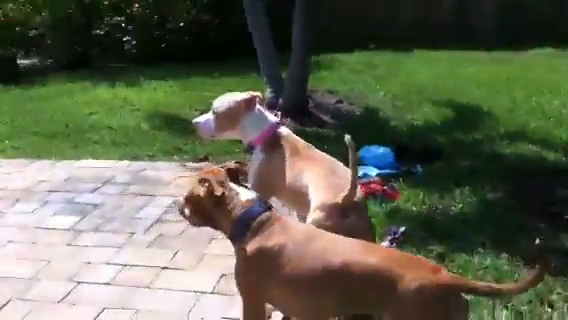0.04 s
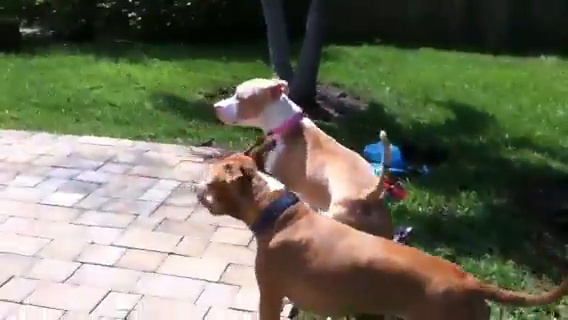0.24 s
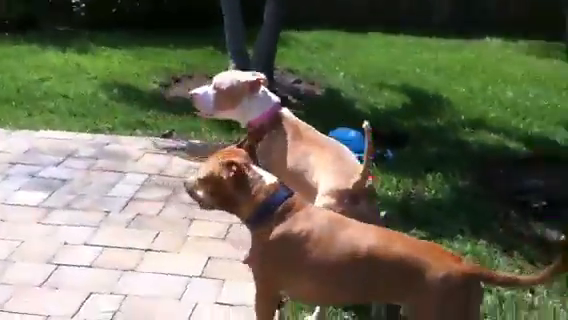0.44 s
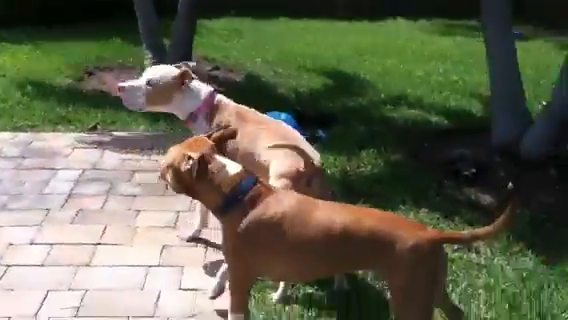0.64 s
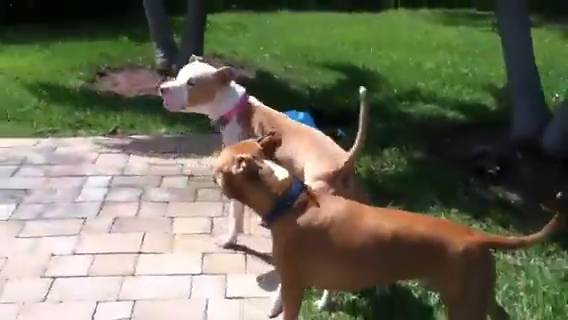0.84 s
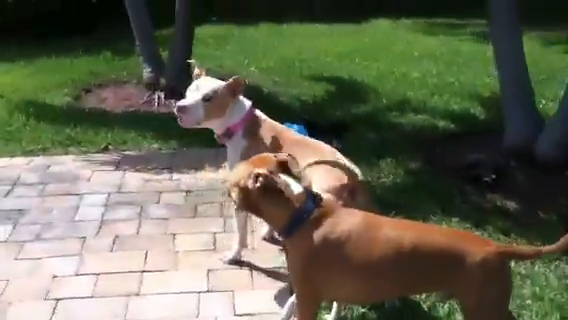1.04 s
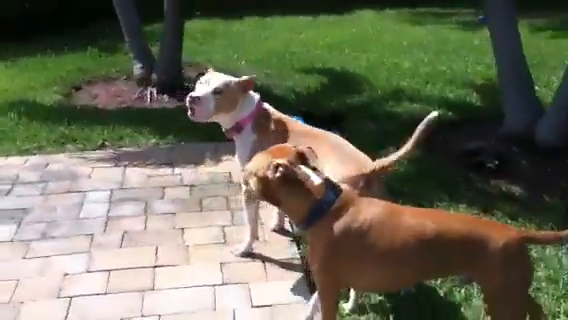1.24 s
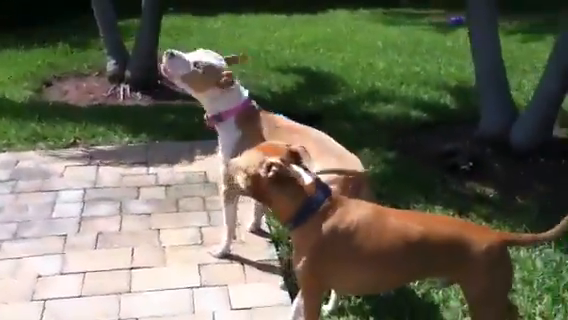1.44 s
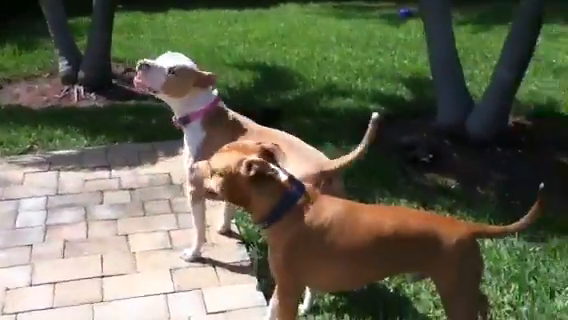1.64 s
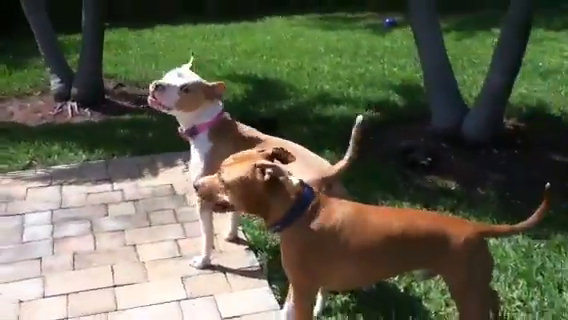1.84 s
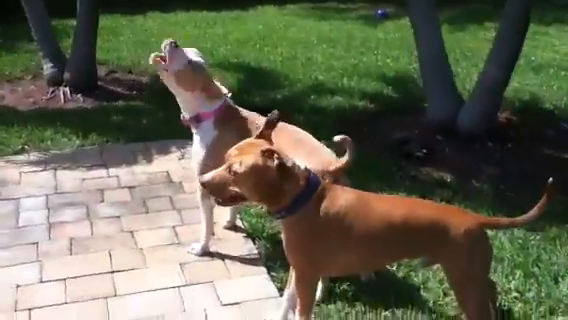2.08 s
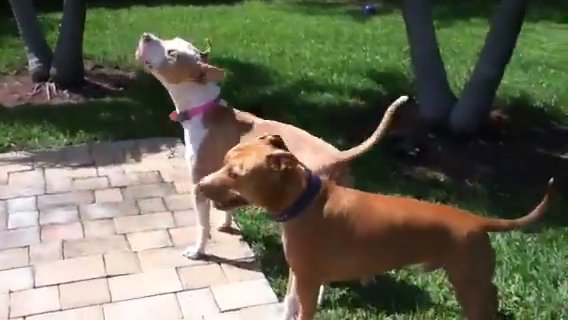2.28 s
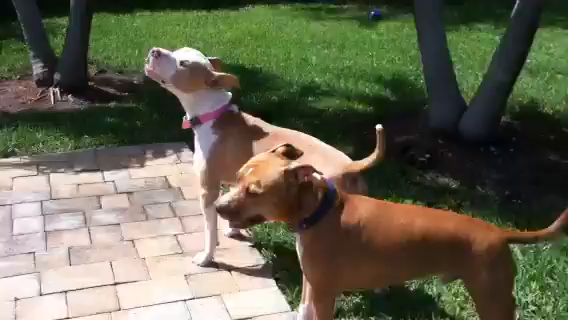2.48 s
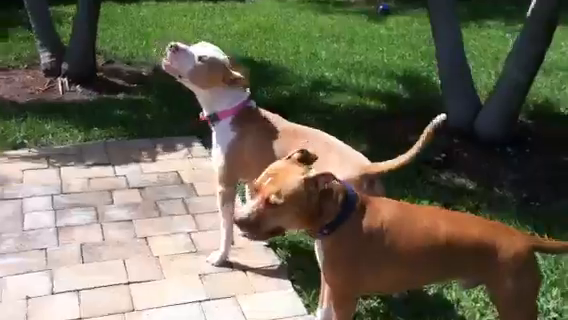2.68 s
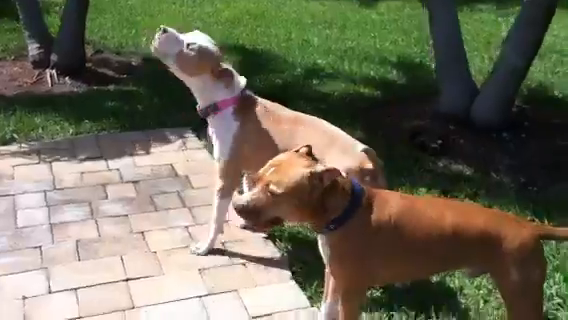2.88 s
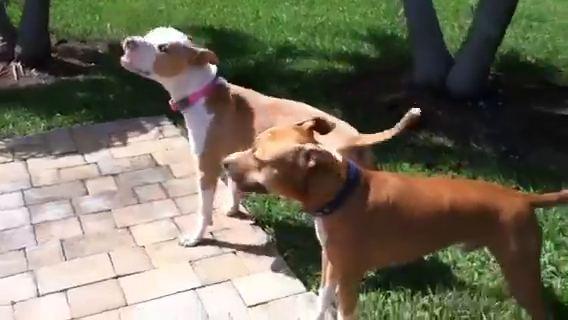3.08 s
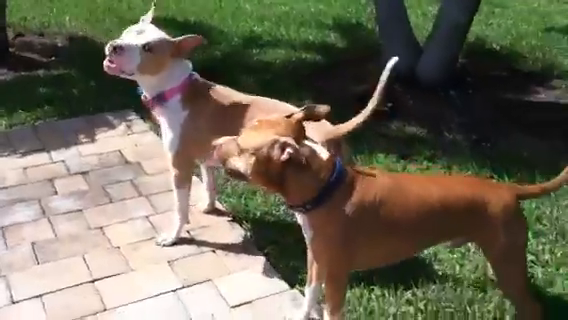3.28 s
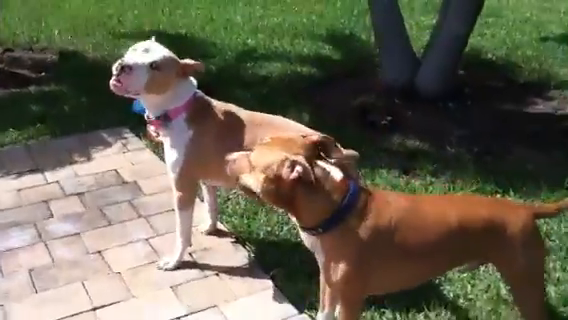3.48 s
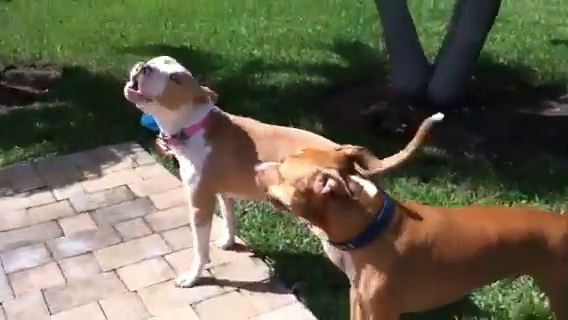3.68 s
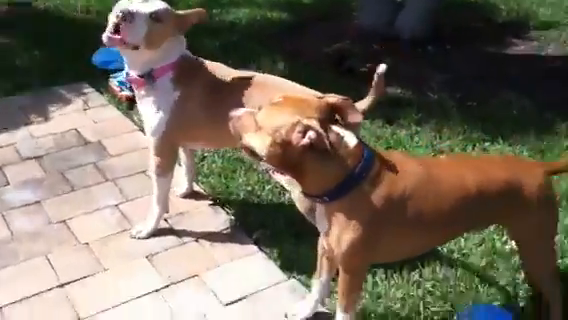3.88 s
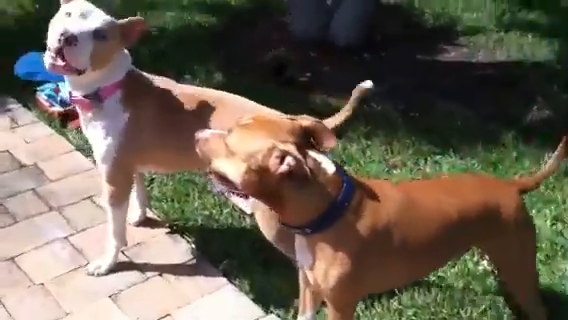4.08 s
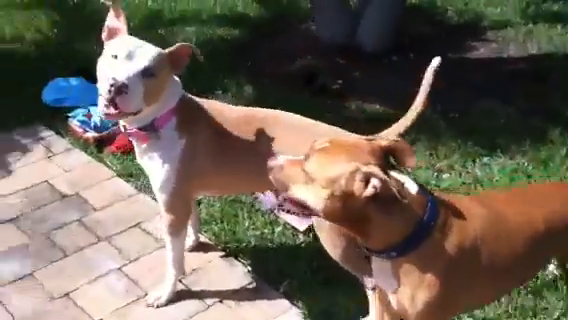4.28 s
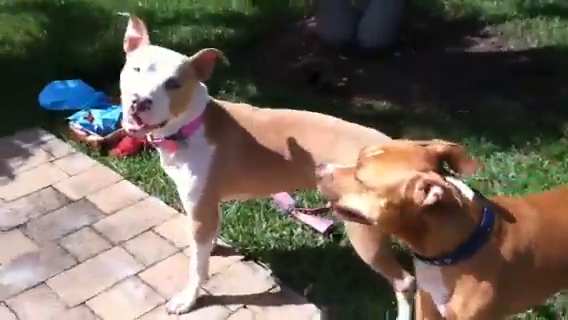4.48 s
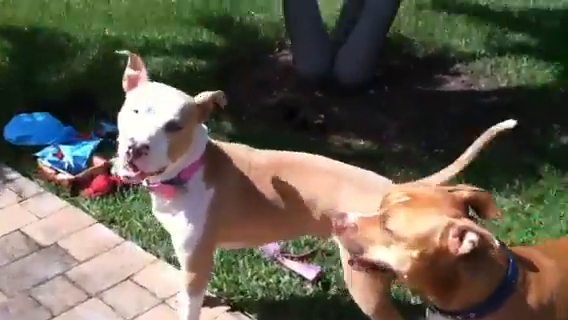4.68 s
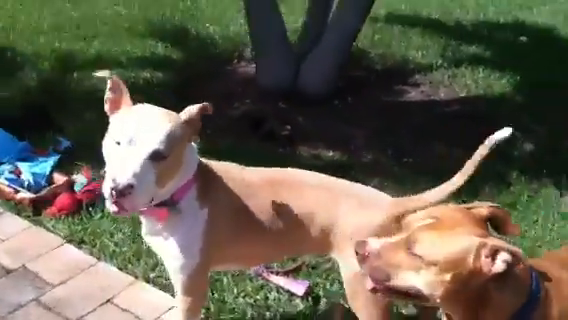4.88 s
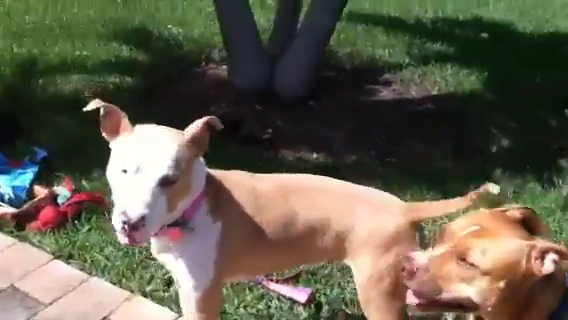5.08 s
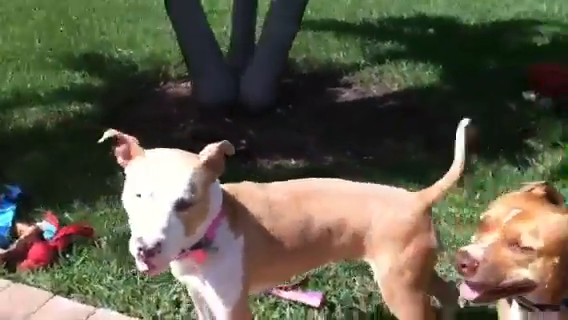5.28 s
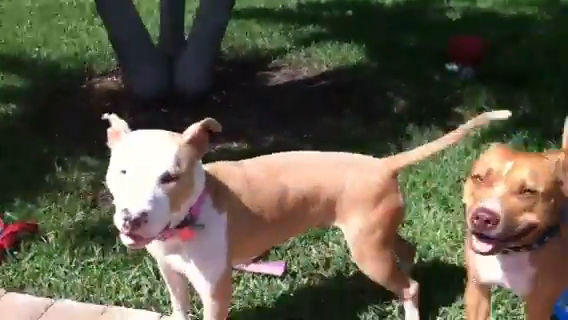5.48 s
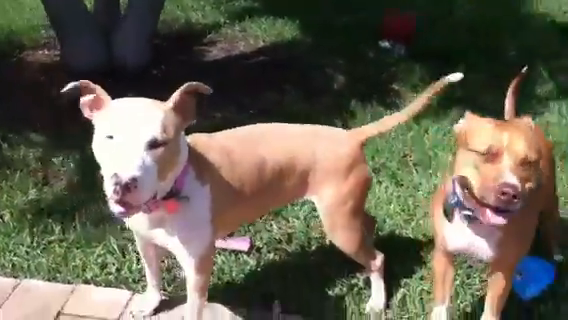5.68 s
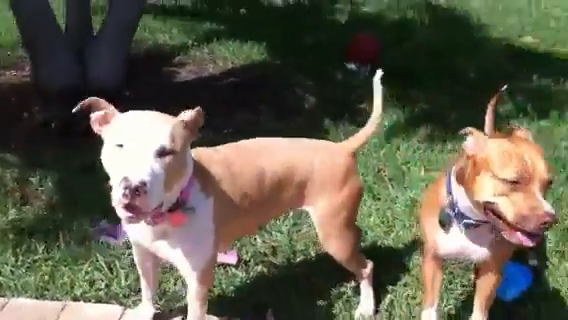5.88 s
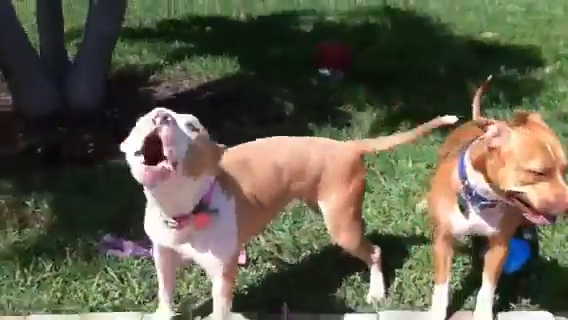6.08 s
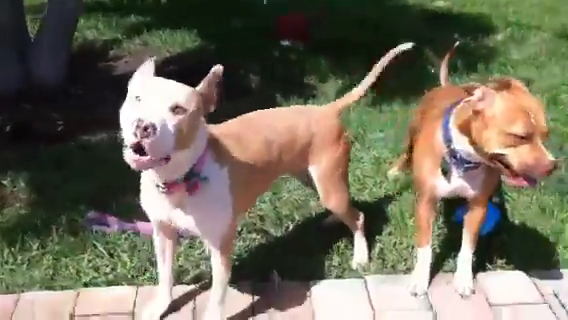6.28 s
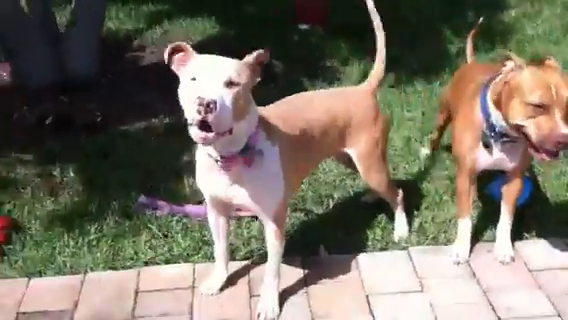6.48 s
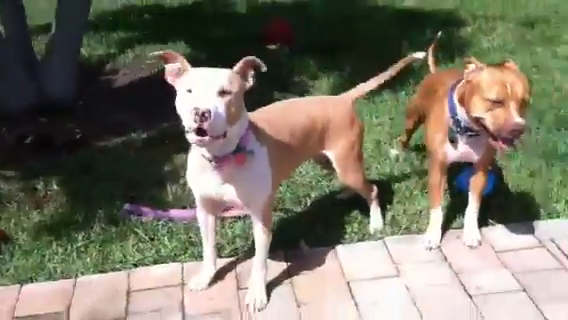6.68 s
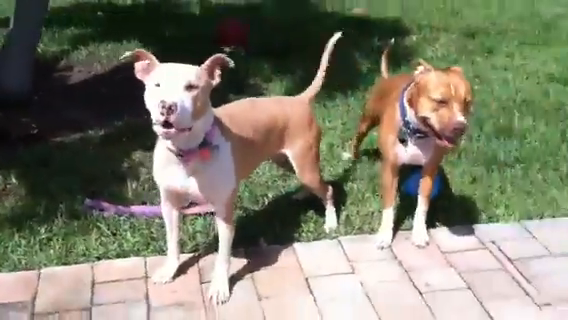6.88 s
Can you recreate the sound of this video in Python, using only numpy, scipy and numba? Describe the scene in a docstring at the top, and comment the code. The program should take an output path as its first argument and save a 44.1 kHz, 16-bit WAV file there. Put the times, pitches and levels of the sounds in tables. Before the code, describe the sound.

Outdoors in a paved backyard, one medium-large dog barks hoarsely, five single barks about three-quarters of a second apart, then over two seconds of quiet and a last bark. Each bounces briefly off walls. Claws tick and air bumps the microphone at the start; collar tags clink between barks. A faint hum and soft outdoor noise lie beneath, captured by a handheld microphone with automatic gain.

```python
"""A dog gives six hoarse single barks in a paved, fenced yard: rough fold pulses and gated breath through moving resonances.
Two wall slaps and a scattered noise tail send each bark back.
Collar tags ring on decaying sines, claws tick as noise bursts, air bumps the microphone in short low swings.
Far birds coo (sines) and call (narrow noise); a machine hums on wavering lines over banded outdoor noise and a breeze.
Gain control lifts the quiet and ducks it all under loud sound."""
import sys
import numpy as np
from scipy import signal
from scipy.io import wavfile
from scipy.ndimage import uniform_filter1d, minimum_filter1d
from numba import njit

SR = 44100
rng = np.random.default_rng(int(sys.argv[2]) if len(sys.argv) > 2 else 0)


def inscribe(sig):
    """Save sig as 16-bit PCM at rate SR to the path in sys.argv[1].

    A 1-D sig is mono; a 2-D sig holds one channel per row.
    Samples are clipped to [-1, 1] before scaling.
    """
    pcm = np.round(np.clip(np.atleast_2d(sig).T, -1, 1) * 32767)
    wavfile.write(sys.argv[1], SR, pcm.astype(np.int16))


N = 306054


def undb(db):
    """Amplitude ratio of a level in dB."""
    return 10 ** (np.asarray(db) / 20)


def unit(x):
    """Scale to rms 1."""
    return x / np.sqrt(np.mean(x ** 2))


@njit
def svf(x, g, k):
    """State-variable band-pass with a moving centre, gain 1 there."""
    y, b, l = np.empty(len(x)), 0., 0.
    for i in range(len(x)):
        v = (b + g[i] * (x[i] - l)) / (1 + g[i] * (g[i] + k[i]))
        b = 2 * v - b
        l = l + 2 * g[i] * v
        y[i] = k[i] * v
    return y


def band(x, hz, width_hz):
    """A resonance applied twice, so that its skirts are steep."""
    g = np.zeros(len(x)) + np.tan(np.pi * hz / SR)
    k = np.zeros(len(x)) + np.pi / 2 * width_hz / hz  # widened: two passes narrow the band
    return svf(svf(x, g, k), g, k)


@njit
def hold(x, fall):
    """Jumps up with the input and sinks back slowly."""
    y, e = np.empty(len(x)), 0.
    for i in range(len(x)):
        e = max(x[i], e * fall)
        y[i] = e
    return y


def walk(rate_hz, size=N):
    """Random levels held 1 / rate_hz s and smoothed twice; spread near 1."""
    k = int(SR / rate_hz)
    steps = np.repeat(rng.standard_normal(size // k + 1), k)
    return 1.3 * uniform_filter1d(uniform_filter1d(steps, k), k)[:size]


def add(out, start_s, x):
    """Mix x in at start_s."""
    i = int(start_s * SR)
    out[i:i + len(x)] += x[:N - i]


def breath(hiss, size, tilt_db_per_octave, palate_hz):
    """Breath turbulence in fixed bands; lips and tongue never rest, so each flickers and drifts."""
    # breath resonances: f/Hz, width/Hz, level/dB before tilt
    breath_bands = [(2960, 600, -5.5), (4060, 310, -6.5), (4704, 380, -1.5), (5300, 1000, -2),
                    (6290, 790, 0.5), (7698, 840, -1), (8460, 1200, -11), (12240, 1900, -14.5)]
    air = 0
    for hz, width_hz, db in breath_bands:
        flicker, drift = walk(60, size=size), walk(25, size=size)
        level_db = db + tilt_db_per_octave * np.log2(hz / palate_hz) + 3.7 * flicker
        air = air + undb(level_db) * unit(band(hiss, hz * (1 + 0.026 * drift), width_hz))
    return unit(air)


def bark(row, effort):
    """Uneven fold pulses and cycle-gated air noise pass through the moving throat."""
    # nose resonances while the third resonance is at rest: f/Hz, width/Hz, level/dB
    nose_bands = [(2007, 370, 0), (2395, 420, 0)]
    # second resonance, nose, palate: gain per mouth opening [dB/dB]
    with_mouth = (0.5, 0.49, .8)
    # second resonance, nose, palate: gain from start to end of a bark [dB]
    with_time_db = (-0.5, -10, 10.5)
    # first, second, third resonance: width/Hz
    throat_width_hz = (146.8, 161.5, 190)
    second_sag_hz, third_sag_hz, sag_curve = 30, 390, 0.83  # the jaw closes fast at first
    roughness, rough_end = .58, .12  # 0-1, and what the tiring folds add at the end
    growl_hz, growl_glide_s = 67.93, .03
    palate_hz, palate_width_hz = 3365, 180
    nose_rest_hz = 1480

    fold_hz, sag_hz, f1_start, f1_end, f2_mid, f3_start, chest_db, ribs_db, *colour_db, tilt_db, growl_s = row
    point_s, *columns = np.transpose(effort)
    start_s, end_s = point_s[0], point_s[-1]
    size = SR // 2
    t = start_s + np.arange(size) / SR
    level_db, mouth_db, air_db = (np.interp(t, point_s, c) for c in columns)
    since_growl_s = t - start_s - growl_s
    done = np.clip(since_growl_s / (end_s - start_s - growl_s), 0, 1)

    # folds
    tense = np.clip(since_growl_s / growl_glide_s + (growl_s == 0), 0, 1)
    hz = growl_hz + tense * (fold_hz - sag_hz * done - growl_hz)
    rough = np.clip(roughness + rough_end * done ** 2, 0, 1)
    cycles = np.cumsum(hz * (1 + .16 * rough * walk(150, size=size))) / SR
    count, phase = cycles.astype(int), cycles % 1
    cycle_db = 3.5 * rough * rng.standard_normal(200)[count]
    pulses = np.diff(count, prepend=0) * undb(cycle_db) * np.sqrt(SR / hz)
    noise = rng.standard_normal(size)
    hiss = unit(noise * np.exp(-phase / 2.0))
    leak = rough * np.maximum(1, 100 / hz)  # slack folds in a slow growl let more air through
    source = pulses + 0.86 * leak * hiss

    # throat
    f1 = f1_start + (f1_end - f1_start) * done
    f2 = f2_mid - second_sag_hz * (done - .5)
    f3 = f3_start - third_sag_hz * done ** sag_curve
    second_db, nose_db, palate_db = (
        c + m * mouth_db + d * (done - .5) for c, m, d in zip(colour_db, with_mouth, with_time_db))
    w1, w2, w3 = throat_width_hz
    voice = unit(band(source, f1, w1))
    voice -= undb(second_db) * unit(band(source, f2, w2))
    voice += undb(mouth_db) * unit(band(source, f3, w3))
    voice += undb(chest_db) * unit(band(source, 435, 92))

    # nose
    closing_mouth = (f3 / nose_rest_hz) ** .65  # nose bands sink more slowly than the third resonance
    nose = 0
    for k, (nose_hz, width_hz, db) in enumerate(nose_bands):
        nose = nose + (-1) ** k * undb(db) * unit(band(source, nose_hz * closing_mouth, width_hz))
    voice -= undb(nose_db) * unit(nose)

    # little leaves the mouth under the chest tone or over the nose band
    mouth_filter = signal.cheby2(5, 22, (305, 2870), "bandpass", fs=SR, output="sos")
    voice = signal.sosfilt(mouth_filter, voice)
    voice += undb(ribs_db) * unit(band(noise, 200, 140))  # low rumble through the ribs

    air = undb(air_db) * breath(hiss, size, tilt_db, palate_hz)
    air += undb(palate_db) * unit(band(source, palate_hz, palate_width_hz))
    opening = np.clip((t - start_s) / 0.01, 0, 1)
    closing = np.exp(-np.maximum(t - end_s, 0) / 0.012)  # the folds stop
    return (voice + air) * undb(level_db) * opening * closing


def yard_tail():
    """What walls, fence and paving scatter back: noise bands, each dying at its own pace."""
    # scattered bands: f/Hz, width/Hz, energy re direct sound/dB, t60/s
    yard_bands = [(422, 250, -13, .38), (648, 370, -18.5, 0.19), (1030, 400, -12.5, 0.5),
                  (1458, 610, -14.5, 0.61), (2102, 710, -8, 0.45), (3470, 250, -5.5, 0.5),
                  (4800, 4500, -9, 0.45), (8000, 9600, -8, 0.25)]
    t = np.arange(SR) / SR
    rise = 1 - np.exp(-t / 0.004)
    tail = np.zeros(SR)
    for hz, width_hz, db, t60_s in yard_bands:
        decaying = band(rng.standard_normal(SR), hz, width_hz) * rise * undb(-60 * t / t60_s)
        tail += undb(db) * np.sqrt(width_hz / SR ** 2 * np.pi) * unit(decaying)
    return tail


def dog():
    """The barks, their slap echoes and the yard's scattered tail."""
    # one row a bark: fold rate/Hz, its sag/Hz, first resonance start/Hz, end/Hz, second mid/Hz,
    # third start/Hz, chest/dB, ribs/dB, second/dB, nose/dB, palate/dB, breath tilt/(dB/octave), growl/s
    barks = [(196.3, -8, 620, 560, 784, 1640, -4.5, -42, 9, -12, -25, -1, 0.00026),
             (275.6, 38, 560, 530, 797, 1580, -7, -37, 3.6, -14, -31.5, .6, 0.00082),
             (282.7, 31, 608, 500, 780, 1620, -8, -42, .2, -13.5, -28.5, -.3, 0.0002),
             (305, 60, 613, 465, 875, 1680, -5, -37, 5.5, -14.5, -28.5, -4.5, 0.00035),
             (244.7, 5, 478, 496, 900, 1560, -20, -28.5, 0.21, -9, -33, -4.5, .07),
             (222.4, 11, 467, 720, 847, 1530, -2, -39.5, 4.3, -10.5, -23.5, 3, 0)]
    # one curve a bark: t/s, level/dB, mouth opening (third resonance re level)/dB, breath re level/dB
    efforts = [
        [(.497, -21.5, -17, -38.5), (.521, -12, -2, -19), (.56, -23, 2, -19), (.595, -19, 1, -18.5),
         (.615, -32, -2, -15.5), (.64, -29.5, -8, -18)],
        [(1.288, -35.5, -30, -36.5), (1.302, -27.5, -20, -27), (1.324, -11.5, -4.5, -21),
         (1.354, -15.5, -4.5, -24), (1.402, -21, -9, -31), (1.44, -25, -3, -23.5)],
        [(2.048, -42, -28, -32), (2.058, -27.5, -26, -39), (2.082, -6, -5.5, -28.5), (2.11, -15, -15.5, -31.5),
         (2.154, -23, -9, -26.5), (2.2, -29.5, 2, -21.5)],
        [(2.774, -43.5, -22, -37), (2.8, -18.5, -15, -30), (2.828, -17, 0.5, -22.5), (2.872, -21, -20, -26),
         (2.896, -18.5, -6, -22.5), (2.93, -32, -12, -26.5)],
        [(3.575, -55, -20, -42.5), (3.627, -44.5, -22.5, -21), (3.649, -29, -30, -35),
         (3.67, -17.5, -28, -24.5), (3.699, -10, -13, -27), (3.72, -25, -20.5, -19), (3.75, -40.5, -14, -5)],
        [(6.041, -19.5, -28, -34), (6.063, -14, -12, -19.5), (6.109, -16, -6.5, -19.5),
         (6.147, -22.5, -1, -23.5), (6.189, -26.5, -22.5, -40.5), (6.2, -47, -8.5, -34)],
    ]
    # slaps from far walls: delay/s, level/dB
    echoes = [(.058, -20.5), (.14, -33.5)]
    dry = np.zeros(N)
    for row, effort in zip(barks, efforts):
        add(dry, effort[0][0], bark(row, effort))
    out = dry.copy()
    for delay_s, db in echoes:
        add(out, delay_s, undb(db) * dry)
    return out + signal.fftconvolve(dry, yard_tail())[:N]


def crack(hz, peak_db):
    """A hard tap: about a millisecond of noise around hz."""
    t = np.arange(SR // 100) / SR
    x = band(rng.standard_normal(len(t)) * np.exp(-t / .0011), hz, 3500)
    return undb(peak_db) * x / np.abs(x).max()


def collar_tags():
    """Each clink is a crack and two decaying modes, the upper one beating."""
    # clinks: t/s, crack/dB, low mode/dB, high mode/dB, share of the free ring time
    clinks = [(0.7758, -39, -46, -53, 0.21), (.7873, -42, -70, -54, 0.34), (.83, -49, -74, -62, 0.79),
              (.852, -52, -78, -59, 1), (1.044, -50.5, -63, -49.5, 0.53), (1.6054, -41.5, -59, -63, .2),
              (1.6597, -52, -71, -71, .2), (3.0788, -38, -51.5, -58, 1.0), (3.1337, -48, -60, -72, 0.46),
              (3.2942, -57.5, -85, -84, .2), (3.3897, -54, -82, -58.5, .4),
              (6.3833, -52, -54.5, -59.5, 0.085), (6.6419, -58, -72, -76, 0.2)]
    low_hz, high_hz, beat_hz = 7060, 10847, 44
    low_t60_s, high_t60_s = 0.42, 0.23  # ringing free
    out, t = np.zeros(N), np.arange(SR // 3) / SR
    low = np.sin(2 * np.pi * low_hz * t)
    high = np.sin(2 * np.pi * high_hz * t) * (1 + 0.91 * np.cos(2 * np.pi * beat_hz * t))
    for start_s, crack_db, low_db, high_db, ring in clinks:
        add(out, start_s, crack(6960, crack_db))
        add(out, start_s, low * undb(low_db - 60 * t / (ring * low_t60_s)))
        add(out, start_s, high * undb(high_db - 60 * t / (ring * high_t60_s)))
    return out


def claws():
    """Claws tick on the paving as cracks; fainter random ones are grit under the paws."""
    # clearest ticks: t/s, level/dB
    ticks = [(.0371, -58), (.0845, -53), (.2044, -62), (0.28, -50.5), (0.2912, -57), (.3125, -58),
             (0.37, -59), (0.473, -53.5)]
    tick_hz, grit_db, grit_until_s = 8500, -64, .46
    out = np.zeros(N)
    for start_s, db in ticks:
        add(out, start_s, crack(tick_hz, db))
    for when, pitch, level in rng.random(size=(8, 3)):
        add(out, when * grit_until_s, crack(tick_hz * (0.84 + 0.5 * pitch), grit_db + 6 * (level - .5)))
    return out


def microphone_bumps():
    """Air bumps are short low swings of the membrane: two damped modes with a soft onset."""
    # bumps: t/s, peak level/dB
    bumps = [(0.072, -33), (0.13, -34.5), (1.635, -50), (1.956, -49), (1.993, -58), (3.94, -58),
             (5.759, -54.5), (5.861, -52.5), (5.92, -49)]
    # membrane modes: f/Hz, level/dB, t60/s
    membrane_modes = [(182.7, 7, 0.016), (430, -19, 0.025)]
    out, t = np.zeros(N), np.arange(SR // 3) / SR
    swing = sum(undb(db - 60 * t / t60_s) * np.sin(2 * np.pi * hz * t) for hz, db, t60_s in membrane_modes)
    swing = swing * (1 - np.exp(-t / 0.011))
    for start_s, db in bumps:
        add(out, start_s, undb(db) * swing / np.abs(swing).max())
    return out


def far_coos():
    """Faint far coos: plain sines under half-sine envelopes."""
    # coos: t/s, length/s, f/Hz, level/dB
    coos = [(6.44, 0.14, 404, -61.5), (6.58, 0.16, 411, -64.5), (6.74, 0.072, 515, -67),
            (6.86, 0.086, 516, -64)]
    out, t = np.zeros(N), np.arange(SR // 3) / SR
    for start_s, length_s, hz, db in coos:
        envelope = np.sin(np.pi * np.clip(t / length_s, 0, 1))
        add(out, start_s, undb(db) * np.sin(2 * np.pi * hz * t) * envelope)
    return out


def far_call():
    """One soft swell of three narrow noise bands."""
    # call bands: f/Hz, width/Hz, level/dB
    call_bands = [(920, 90, -67), (2240, 95, -74.5), (2595, 92, -71)]
    centre_s, length_s = 5.18, 0.066
    swell = np.exp(-((np.arange(N) / SR - centre_s) / length_s) ** 2)
    noise = rng.standard_normal(N)
    return swell * sum(undb(db) * unit(band(noise, hz, width_hz)) for hz, width_hz, db in call_bands)


def machine_hum():
    """A machine's steady lines, each wavering in level."""
    # lines: f/Hz, mean rms level/dB
    hum_lines = [(177.6, -74), (236.9, -73), (1771, -82.5), (6191, -93)]
    t, out = np.arange(N) / SR, np.zeros(N)
    for hz, db in hum_lines:
        out += np.sqrt(2) * undb(db + 2.8 * walk(13.0)) * np.sin(2 * np.pi * hz * t)
    return out


def breeze():
    """Low buffeting and leaf rustle: two noise bands with fluttering levels."""
    # breeze: t/s, low buffeting/dB, leaf rustle/dB
    breeze_curve = [(0, -53, -73.5), (.12, -57.5, -75), (.3, -78, -79), (.5, -65.5, -78.5),
                    (1, -71.5, -86.5), (5, -69.5, -81.5), (5.7, -65.5, -89.5), (6.1, -74, -92.5),
                    (6.94, -66.5, -91)]
    t = np.arange(N) / SR
    point_s, low_db, leaf_db = np.transpose(breeze_curve)
    buffeting = unit(band(rng.standard_normal(N), 220, 110.47))
    rustle = unit(band(rng.standard_normal(N), 6500, 5000))
    out = buffeting * undb(np.interp(t, point_s, low_db) + 1.0 * walk(25))
    return out + rustle * undb(np.interp(t, point_s, leaf_db) + 1.6 * walk(56))


def outdoor_noise():
    """Third-octave-spaced noise bands that swell together and flicker alone."""
    # spectrum shape: f/Hz, relative density/(dB per Hz)
    air_spectrum = [(15, -59), (25, -31), (45, -14), (80, -12.5), (175, -1.5), (354, -13.5), (503, -11),
                    (607, -15.5), (962, -13.5), (1840, -21), (5730, -32.5), (6380, -35.5), (9320, -38),
                    (16000, -54.5)]
    out, swell = 0, walk(1.0)
    point_hz, density_db = np.transpose(air_spectrum)
    for hz in 28 * 2 ** np.arange(0, 9.3, 1 / 3):
        db = np.interp(np.log(hz), np.log(point_hz), density_db) + 0.48 * swell + 1.1137 * walk(17)
        out = out + undb(db) * band(rng.standard_normal(N), hz, hz / 4)
    return unit(out) * undb(-61.5)


def scene():
    """The dog, its small sounds, the far birds and the background, as one channel."""
    near = dog() + collar_tags() + claws() + microphone_bumps()
    far = far_coos() + far_call() + machine_hum() + breeze() + outdoor_noise()
    return (near + far)[None]


def record(dry):
    """Gain control drops on loud sound and creeps back; a limiter holds the peaks; the top is cut."""
    lift_db, duck_from_db, recover_s = 7.5, -39, 1.3
    ceiling, top_hz, lopsided = .72, 15900, .045
    loud = np.clip(uniform_filter1d(np.abs(dry[0]), size=256) / undb(duck_from_db) - 1, 0, 1)
    duck = uniform_filter1d(hold(loud, np.exp(-1 / (recover_s * SR))), size=512)
    x = dry * undb(lift_db * (1 - duck))
    x = x + lopsided * x ** 2  # an uneven input stage puts a thump under loud sound
    x = signal.sosfilt(signal.butter(2, 55, "highpass", fs=SR, output="sos"), x)
    limit = np.minimum(1, ceiling / (np.abs(x) + 1e-9))
    x = x * uniform_filter1d(minimum_filter1d(limit, size=129), size=129)
    return signal.sosfilt(signal.ellip(8, .2, 70, top_hz, fs=SR, output="sos"), x)


dry = scene()
out = record(dry)
inscribe(out)
```